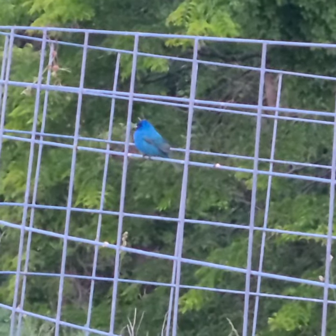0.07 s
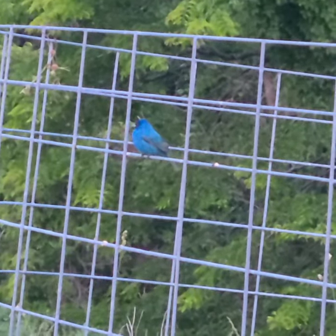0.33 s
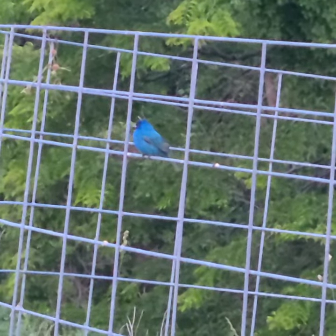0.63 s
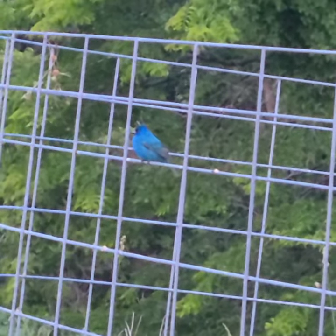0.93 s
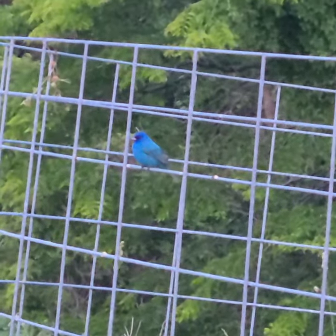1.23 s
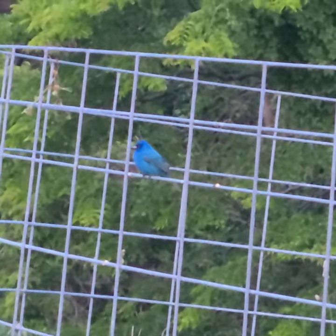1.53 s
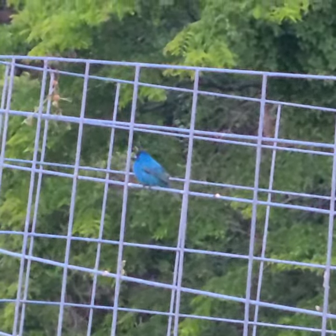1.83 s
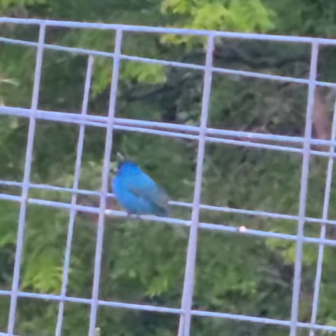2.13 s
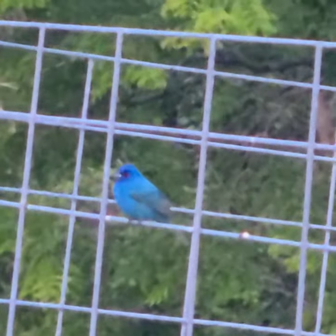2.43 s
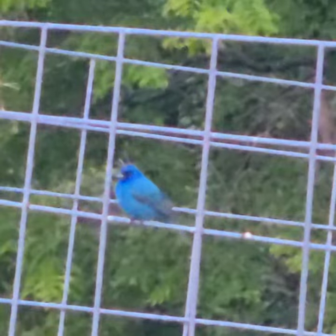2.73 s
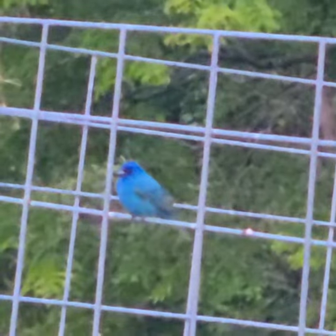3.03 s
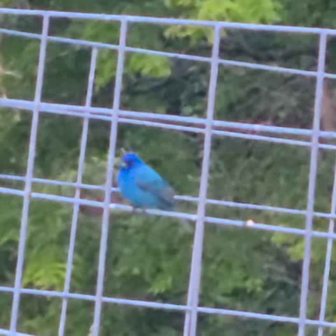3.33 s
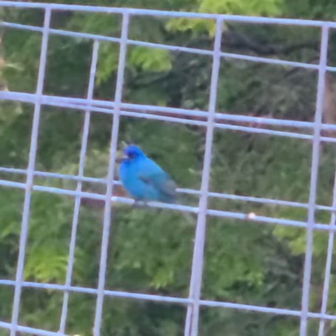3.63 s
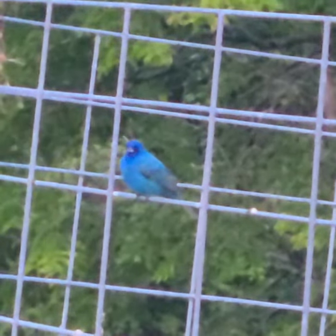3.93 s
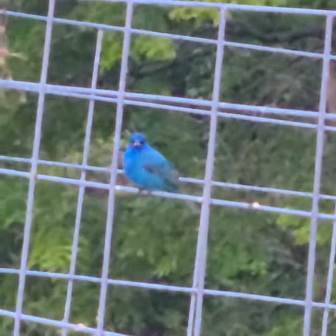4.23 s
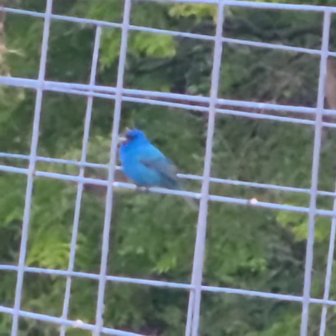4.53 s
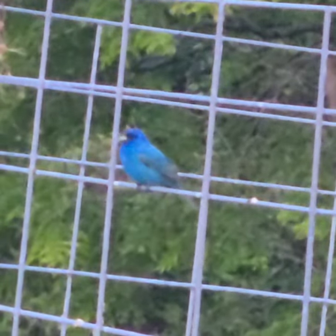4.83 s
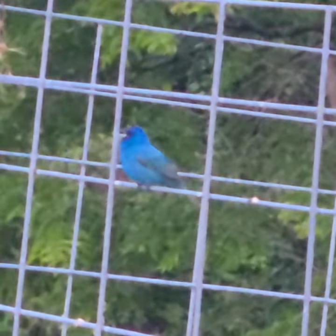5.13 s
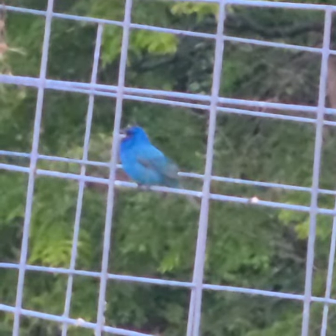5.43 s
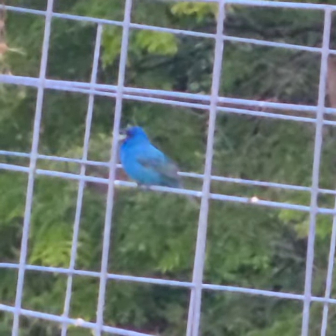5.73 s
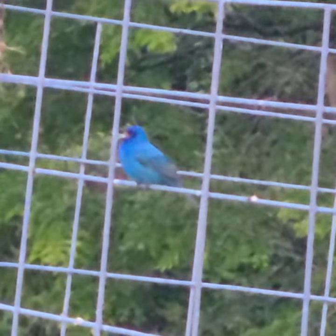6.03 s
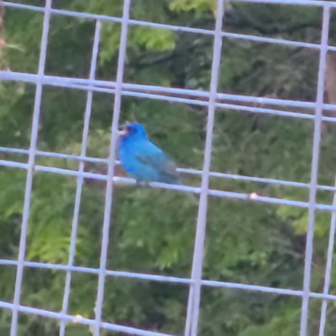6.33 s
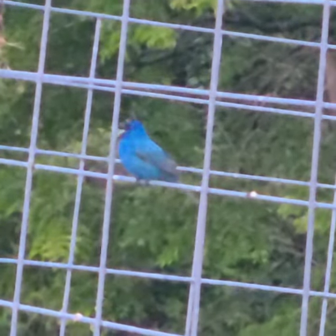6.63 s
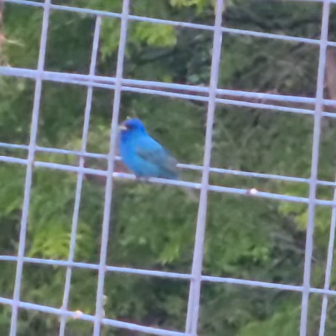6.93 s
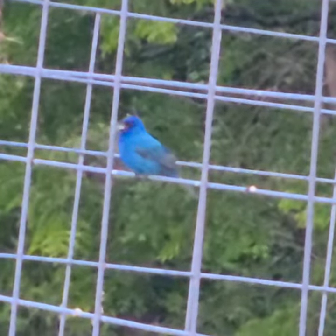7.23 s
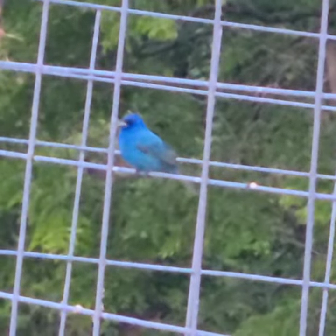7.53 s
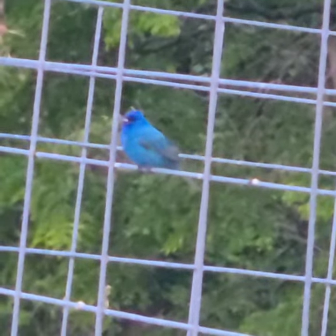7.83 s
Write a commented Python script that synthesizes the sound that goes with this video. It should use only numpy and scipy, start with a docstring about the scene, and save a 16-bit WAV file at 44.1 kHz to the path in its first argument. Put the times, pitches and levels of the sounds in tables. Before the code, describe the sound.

A songbird sings one loud, high song of rapid sweeping chirps outdoors, with a few microphone bumps over quiet background air.

```python
"""Songbird on a wire fence.

One long song from the syrinx: soft opening whistles, a falling cascade, then whistled syllables,
most of them sung twice, and three buzzy trills. The trees scatter each note back. A hand-held camera
is bumped and brushed over a quiet outdoor wash; another bird calls faintly far away."""
import sys
import numpy as np
from scipy import signal
from scipy.fft import rfft, irfft
from scipy.io import wavfile
from scipy.ndimage import uniform_filter1d, minimum_filter1d

SR = 44100
rng = np.random.default_rng(int(sys.argv[2]) if len(sys.argv) > 2 else 0)


def bounce(signal):
    """Save signal as a 16-bit WAV file at the path given by the first command-line argument."""
    frames = np.transpose(np.atleast_2d(signal))
    limited = np.clip(frames, -1, 1)
    pcm = np.round(limited * 32767).astype(np.int16)
    wavfile.write(sys.argv[1], SR, pcm)


N = 355887
BAND_LIMIT_HZ = 15800

# notes by syllable: (level [dB], attack [s], release [s], path of (time [s], pitch [Hz]))
SYLLABLE_NOTES = { "chip": [(-26, 0.034, 0.0053, [(0, 6420), (.041, 7900)]),
                  (-24, 0.047, 0.004, [(.034, 5170), (.076, 5133), (.082, 4760), (.089, 3050)]),
                  (-16.5, 0.0089, 0.018, [(.09, 7100), (.099, 6400), (.109, 5180), (.117, 2920)])],
                  "sweep": [(-15.5, .022, 0.046, [(0, 4310), (.032, 4665), (.054, 4460)]),
                  (-15, 0.0051, .004, [(.073, 3930), (.097, 3510), (.127, 2920)]),
                  (-13.5, 0.064, .15, [(.13, 5450), (.16, 5943), (.195, 5996), (.287, 6140)])],
                  "slur": [(-14, 0.014, 0.002, [(0, 3610), (.005, 2830), (.016, 3330), (.036, 2563)]),
                  (-13, 0.027, 0.0037, [(.052, 4700), (.062, 4670), (.1, 3510), (.107, 3830)])],
                  "swoop": [(-15.5, 0.0027, 0.0085, [(0, 6800), (.016, 5500), (.035, 4744), (.065, 5510),
                  (.076, 5100)])], "arch": [(-17.5, 0.015, .008, [(0, 5890), (.015, 7740), (.023, 8290),
                  (.033, 6940), (.042, 7600)]), (-13, 0.013, 0.0067, [(.06, 2425), (.079, 3375),
                  (.101, 4223), (.116, 5400), (.124, 5935), (.147, 5930), (.159, 5360), (.186, 3710),
                  (.197, 3445), (.237, 2865)])], "dip": [(-7.5, 0.014, 0.01, [(-.002, 3220), (.003, 5290),
                  (.0065, 6438), (.0105, 6010), (.0145, 5460), (.019, 5470), (.028, 8300)]),
                  (-12.5, 0.015, .018, [(.052, 3250), (.061, 4600), (.08, 3410), (.096, 3274), (.121, 4080),
                  (.14, 4420), (.156, 4110)])], "loop": [(-11, 0.018, 0.0044, [(0, 8100), (.008, 7200),
                  (.02, 6725), (.031, 7180), (.043, 8120)]), (-14, 0.024, 0.0037, [(.048, 3290),
                  (.072, 3304), (.096, 3080), (.11, 2667)]), (-12.5, 0.0092, .01, [(.112, 2770),
                  (.118, 4920), (.1225, 6010), (.13, 5310), (.147, 4150), (.158, 4190), (.173, 5397),
                  (.188, 5437), (.198, 5220)])], "hook": [(-17, 0.11, 0.003, [(0, 4030), (.068, 4010)]),
                  (-14, 0.025, .012, [(.065, 3900), (.08, 5360), (.092, 5540), (.104, 5300), (.122, 3220),
                  (.137, 3110)])], }
# song order: (start [s], syllable, gain [dB], time stretch [ratio])
SONG_ORDER = [(4.271, "chip", -2, 1.02), (4.428, "chip", 3.5, 0.99), (4.597, "sweep", 1, 0.98),
              (4.948, "slur", -1.5, 1.037), (5.105, "slur", -0.5, 0.99), (5.31, "swoop", 0, 0.99),
              (5.61, "arch", 0.5, 1.009), (5.891, "arch", 0.5, 0.99), (6.211, "dip", 0.5, 1.04),
              (6.408, "dip", 0, 1.0), (6.619, "loop", -1, 1.008), (6.854, "loop", -1, 0.99),
              (7.138, "hook", 0.5, 1.003)]


def syllables():
    """Each syllable is a set pattern of notes, repeated almost exactly."""
    out = np.zeros((2, N))
    for start, name, gain_db, stretch in SONG_ORDER:
        for db, attack_s, release_s, turns in SYLLABLE_NOTES[name]:
            path = [(s * stretch, hz) for s, hz in turns]
            add(out, start + path[0][0], note(path, db + gain_db, attack_s, release_s))
    return out


# plain whistles: (start [s], length [s], from [Hz], to [Hz], level [dB])
PLAIN_WHISTLES = [(3.425, 0.046, 5350, 5360, -47), (3.487, 0.044, 4770, 4820, -45),
                  (3.65, 0.063, 5380, 5580, -38), (3.715, 0.047, 4610, 4480, -30.5),
                  (3.919, 0.066, 7400, 6000, -36), (7.279, 0.032, 3000, 2623, -16.5),
                  (7.309, 0.027, 2865, 2700, -12.5)]
# cascade: (start [s], middle pitch [Hz], level [dB])
UPSWEEPS = [(3.967, 5520, -27), (3.991, 5260, -26), (4.019, 4330, -24.5), (4.043, 4040, -26.5),
            (4.071, 3280, -29), (4.121, 3110, -25.5), (4.171, 3120, -24.5)]


def glides(ramp_share=0.39, sweep_cycles=120, rise_hz=1130, sweep_ramp_s=0.016):
    """Plain whistles swell and fade; upsweeps of equal cycle count slow as the cascade falls."""
    out = np.zeros((2, N))
    for start, length_s, from_hz, to_hz, db in PLAIN_WHISTLES:
        ramp_s = ramp_share * length_s
        add(out, start, note([(0, from_hz), (length_s, to_hz)], db, ramp_s, ramp_s))
    for start, hz, db in UPSWEEPS:
        path = [(0, hz - rise_hz / 2), (sweep_cycles / hz, hz + rise_hz / 2)]
        add(out, start, note(path, db, sweep_ramp_s, sweep_ramp_s))
    return out


# trills: (start [s], end [s], trough [Hz], crest [Hz], swing rate [Hz], crest sharpness [exponent],
# trough level [dB], crest gain [dB], fading [share])
TRILL_NOTES = [(5.258, 5.33, 6420, 7410, 190, 2.2, -23.5, -5.5, 0.97),
               (5.38, 5.556, 2996, 4134, 43.3, 0.78, -38, 15, 0.13),
               (7.402, 7.557, 6070, 6920, 60.5, 3, -21, -12, 0.73)]


def trills(buzz_hz=310, buzz_depth=.085, throat_margin=1.014):
    """The pitch swings in arches, roughened by a faster buzz; the throat keeps it in its band."""
    out = np.zeros((2, N))
    for start, end, low_hz, high_hz, rate_hz, sharpness, db, crest_db, fade in TRILL_NOTES:
        t = np.arange(start, end, 1 / SR)
        swing = abs(np.sin(np.pi * rate_hz * (t - end))) ** sharpness
        buzz = 1 + buzz_depth * np.sin(2 * np.pi * buzz_hz * t)
        hz = (low_hz + (high_hz - low_hz) * swing) * buzz
        trill = whistle(hz, db + crest_db * swing, jitter=0.0067, flutter_samples=30)
        trill = band(trill, low_hz / throat_margin, high_hz * throat_margin, order=3)
        add(out, start, trill * signal.windows.tukey(len(t), fade))
    return out


# whistle loudness by pitch, strongest around 5 kHz: (pitch [Hz], gain [dB])
PITCH_GAIN = [(2400, -16), (2900, -13.5), (3250, -10.5), (3600, -6.5), (4000, -6.5), (4600, -1),
              (5400, -1.5), (6000, -7.5), (6900, -6.5), (8100, -19.5)]


def note(path, db, attack_s, release_s, fade_db=-17.5):
    """One whistle along a pitch path: attack, hold, release, loudest around 5 kHz."""
    turns_s, turns_hz = np.transpose(path)
    t = np.arange(turns_s.min(), turns_s.max(), 1 / SR)
    hz = np.interp(t, np.sort(turns_s), turns_hz)
    attack = np.maximum(1 - (t - t[0]) / attack_s, 0) ** 2
    release = np.maximum(1 - (t[-1] - t) / release_s, 0) ** 2
    return whistle(hz, db + fade_db * (attack + release) + lookup(PITCH_GAIN, hz))


# whistle at the microphones: (pitch [Hz], left minus right [dB], left lead [s])
WHISTLE_STEREO = [(3250, -1, .0001), (3750, 0, .000088), (4300, -1, .00012), (5400, -3, .000145),
                  (6150, 7, .000235), (7300, 11, .000215)]


def whistle(hz, db, jitter=0.0036, flutter_db=3.0, flutter_samples=170, octave_db=-53, edge_s=.009):
    """The syrinx gives a nearly pure tone with a faint, unsteady octave; it arrives left first."""
    count = len(hz)
    hz = uniform_filter1d(hz, size=90) * (1 + jitter * waver(count, 60))
    lag_s = np.outer([0, 1], lookup(WHISTLE_STEREO, hz, column=2))
    phase = 2 * np.pi * (np.cumsum(hz) / SR - lag_s * hz)
    edges = signal.windows.tukey(count, min(edge_s * SR / count, .2))
    level = amp(db + flutter_db * waver(count, flutter_samples)) * edges
    octave = amp(octave_db + 4 * waver(count, 30)) * np.sin(2 * phase)
    return np.sqrt(2) * level * pan(lookup(WHISTLE_STEREO, hz)) * (np.sin(phase) + octave)


def near_bounce(x, db=-17, delay_s=.00168):
    """Direct sound plus a reflection beside the camera: the level ripples as the pitch sweeps."""
    delayed = np.pad(x, ((0, 0), (round(delay_s * SR), 0)))[:, :N]
    return x + amp(db) * delayed


def foliage(x, near_db=-15, near_t60_s=.13, far_db=-33, far_t60_s=1.0, tilt_db_per_octave=4):
    """Near leaves scatter a short echo, the wood behind a faint long one; both favour high notes."""
    t, hz = np.arange(SR) / SR, np.fft.rfftfreq(SR, 1 / SR)
    taps = rng.choice([-1., 1.], (2, SR)) * (rng.random((2, SR)) < .1) * (t > .004)
    echo = 0
    for db, t60_s in (near_db, near_t60_s), (far_db, far_t60_s):
        tail = taps * 1000 ** (-t / t60_s)
        echo = echo + amp(db) * tail / np.linalg.norm(tail, axis=1, keepdims=True)
    octaves = np.log2(np.clip(hz, 2500, 8000) / 5000)
    echo = irfft(rfft(echo) * amp(tilt_db_per_octave * octaves))
    return signal.fftconvolve(x, echo, axes=1)[:, :N]


def sheen(x, db=-55, low_hz=11000, linger_s=.015):
    """A thin hiss rides on the loud notes and lingers a moment."""
    pole = np.exp(-1 / (linger_s * SR))
    envelope = np.sqrt(abs(signal.lfilter([1 - pole], [1, -pole], x ** 2)))
    hiss = unit_rms(band(rng.standard_normal((2, N)), low_hz, BAND_LIMIT_HZ))
    return amp(db) * envelope * hiss


# knocks: (time [s], click level [dB], click pitch [Hz], thud level [dB])
CASE_KNOCKS = [(0.757, -24, 1170, -39), (0.8381, -18, 1000, -42), (0.848, -22, 1800, -54),
               (1.5463, -14, 1430, -34), (1.5741, -23.5, 3620, -36), (3.471, -11.5, 1370, -19)]
# finger rubs: (start [s], end [s], level [dB], brightest [Hz])
CASE_RUBS = [(0.748, 0.8, -50.5, 1380), (0.843, 0.916, -46.5, 2800)]


def handling(thud_hz=66, thud_s=0.017, click_cycles=0.47, grit_db=-14, grit_s=0.0085, side_db=-9):
    """Each knock clicks the camera case and rocks it with a low thud; fingers rub it briefly."""
    out, t = np.zeros((2, N)), np.arange(SR // 5) / SR
    for start, click_db, hz, thud_db in CASE_KNOCKS:
        click = np.sin(2 * np.pi * hz * t) * np.exp(-t * hz / click_cycles)
        grit = amp(grit_db) * rng.standard_normal(len(t)) * np.exp(-t / grit_s)
        thud = -np.sin(2 * np.pi * thud_hz * t) * np.exp(-t / thud_s)
        add(out, start, amp(click_db) * band(click + grit, hz / 10, hz * 1.4) + amp(thud_db) * thud)
    for start, end, db, hz in CASE_RUBS:
        count = round((end - start) * SR)
        rub = unit_rms(band(rng.standard_normal(count), hz * 0.48, hz * 1.72, order=3))
        edge = amp(-17) * unit_rms(band(rng.standard_normal(count), hz * 3.0, hz * 3.74))
        add(out, start, amp(db) * (rub + edge) * signal.windows.tukey(count, .5))
    return out * pan(side_db)[:, None]


# far calls: (start [s], end [s], from [Hz], to [Hz], arch height [Hz], level [dB])
FAR_CALLS = [(0.0, 0.084, 5230, 4030, 0, -47.5), (.2, .3, 3700, 3310, 250, -62),
             (.355, 0.457, 3700, 3300, 300, -61), (.515, 0.607, 3700, 3300, 298, -63),
             (3.385, 3.612, 3650, 2270, 0, -59.5)]


def far_bird():
    """Faint, slightly hoarse whistles that fall, some over an arch."""
    out = np.zeros((2, N))
    for start, end, from_hz, to_hz, arch_hz, db in FAR_CALLS:
        count = round((end - start) * SR)
        hz = np.geomspace(from_hz, to_hz, count) + arch_hz * np.sin(np.linspace(0, np.pi, count))
        add(out, start, whistle(hz, db, jitter=0.014) * signal.windows.tukey(count, .5))
    return out


# air spectrum: (frequency [Hz], relative density [dB])
AIR_SPECTRUM = [(25, -24), (65, 4.5), (118, -2), (150, -23.5), (370, -5.5), (520, -16), (800, -12),
                (1400, -13), (1650, -18.5), (2500, -22), (3100, -17), (4000, -25), (9000, -30.5),
                (12000, -24.5)]
# air balance: (frequency [Hz], left minus right [dB])
AIR_BALANCE = [(70, -8.5), (250, -1), (1300, -8), (3000, -3)]
# left-right likeness: (frequency [Hz], coherence [0..1])
AIR_COHERENCE = [(60, 0.23), (130, 0.68), (300, 0.87), (670, 0.59), (1510, 0.29), (3400, .25), (7500, .05)]
# low distant rush: (time [s], level [dB])
RUSH_LEVEL = [(0, -81), (3.8, -68.5), (5.301, -59.5), (6.0, -67.5), (6.422, -55), (6.621, -47.5),
              (6.802, -63), (7.47, -55), (8.07, -62)]


def wash(air_db=-49.5, patchy_db=1.92, left_lead_s=.00007, dull_above_hz=7700, dull_db=-15,
         swell_at_s=4.9, swell_width_s=.65, swell_db=5, swell_below_hz=600, rush_hz=(178, 290)):
    """Distant air and leaves in drifting patches; the bass swells once, a low rush comes and goes."""
    hz = np.fft.rfftfreq(2048, 1 / SR)
    t = np.arange(N // 512 + 5) * 512 / SR
    left_re, left_im, apart_re, apart_im, patches = rng.standard_normal((5, len(hz), len(t)))
    left, apart = left_re + 1j * left_im, apart_re + 1j * apart_im
    patches = unit_rms(uniform_filter1d(uniform_filter1d(patches, size=24, axis=0), size=6, axis=1))
    coherence = lookup(AIR_COHERENCE, hz)[:, None]
    delay = np.exp(-2j * np.pi * hz * left_lead_s)[:, None]
    right = delay * coherence * left + np.sqrt(1 - coherence ** 2) * apart
    noise = np.array([left, right]) * amp(patchy_db * patches) * pan(lookup(AIR_BALANCE, hz))[..., None]
    bass = np.exp(-(hz / swell_below_hz) ** 2 / 2)
    swell = np.exp(-((t - swell_at_s) / swell_width_s) ** 2 / 2)
    spectrum_db = lookup(AIR_SPECTRUM, hz) + dull_db * (hz > dull_above_hz)
    colour = amp(spectrum_db[:, None] + swell_db * np.outer(bass, swell))
    air = signal.istft(noise * colour, nperseg=2048, noverlap=1536)[1][:, :N]
    white = signal.istft(noise, nperseg=2048, noverlap=1536)[1][:, :N]
    rush_db = np.interp(np.arange(N) / SR, *np.transpose(RUSH_LEVEL))
    return amp(air_db) * unit_rms(air) + amp(rush_db) * unit_rms(band(white, *rush_hz))


def amp(db):
    return 10 ** (np.asarray(db) / 20)


def unit_rms(x):
    return x / np.sqrt(np.mean(x ** 2) + 1e-20)


def lookup(table, hz, column=1):
    """Interpolate over log frequency."""
    table = np.array(table)
    return np.interp(np.log(hz + 1), np.log(table[:, 0]), table[:, column])


def add(mix, start_s, sound):
    part = mix[:, max(round(start_s * SR), 0):][:, :sound.shape[-1]]
    part += sound[..., :part.shape[1]]


def band(x, low_hz, high_hz, order=2):
    sos = signal.butter(order, [low_hz, min(high_hz, .49 * SR)], "band", fs=SR, output="sos")
    return signal.sosfilt(sos, x)


def pan(side_db):
    """Constant-power left and right gains."""
    gains = np.array([amp(side_db / 2), amp(-side_db / 2)])
    return gains / np.sqrt(np.mean(gains ** 2, 0))


def waver(count, smooth_samples):
    """Smooth noise, unit RMS."""
    noise = uniform_filter1d(rng.standard_normal(count), smooth_samples)
    return unit_rms(uniform_filter1d(noise, smooth_samples))


def scene():
    """The birds and their echoes, the hand on the camera, the outdoor wash."""
    birds = glides() + syllables() + trills() + far_bird()
    birds = near_bounce(birds) + foliage(birds)
    return birds + sheen(birds) + handling() + wash()


def record(dry, ceiling=.93):
    """A quick limiter holds the loudest chirps just under full scale; then the band limit."""
    gain = np.minimum(1, ceiling / (abs(dry).max(0) + 1e-9))
    limited = dry * uniform_filter1d(minimum_filter1d(gain, size=201), size=201)
    lowpass = signal.firwin(511, BAND_LIMIT_HZ, window=("kaiser", 9), fs=SR)
    return signal.oaconvolve(limited, lowpass[None], "same")


dry = scene()
out = record(dry)
bounce(out)
```